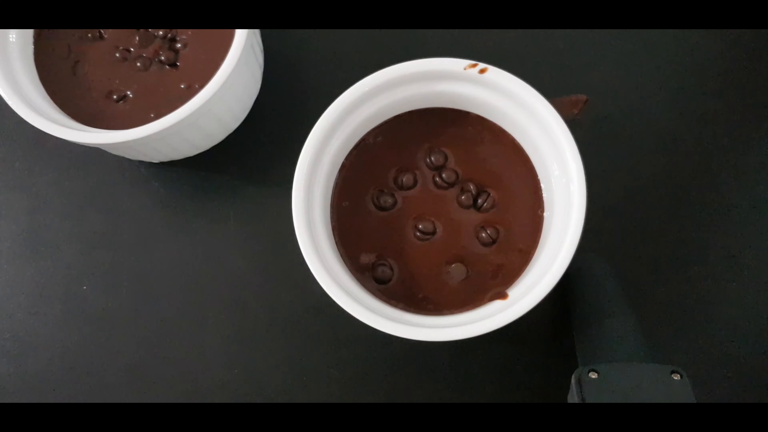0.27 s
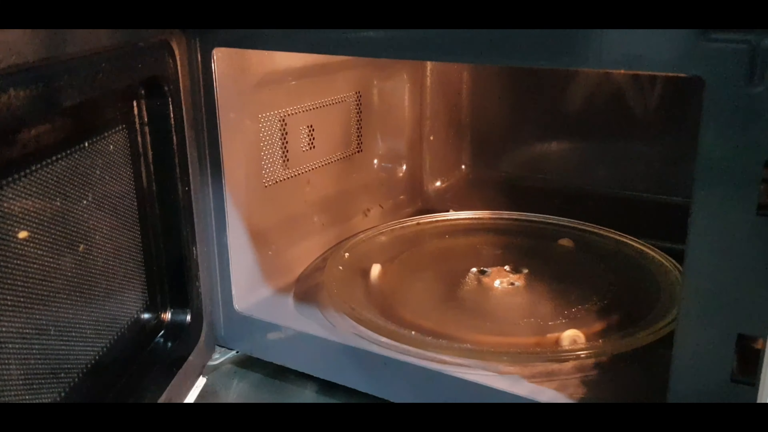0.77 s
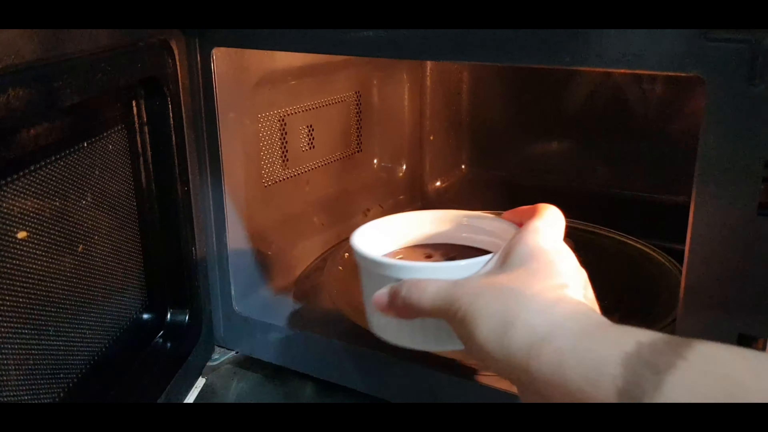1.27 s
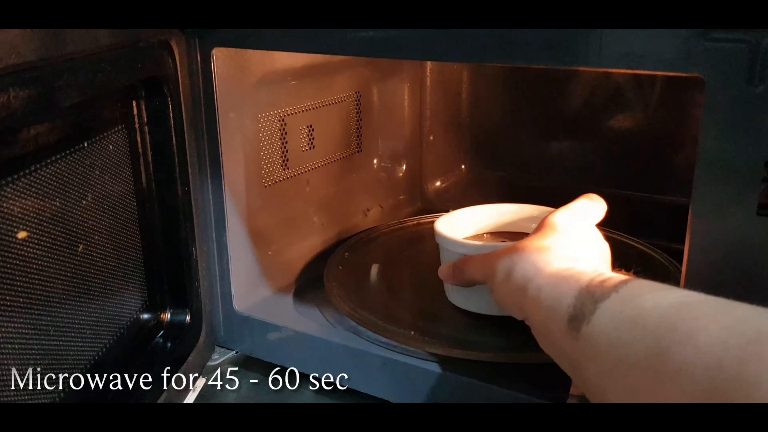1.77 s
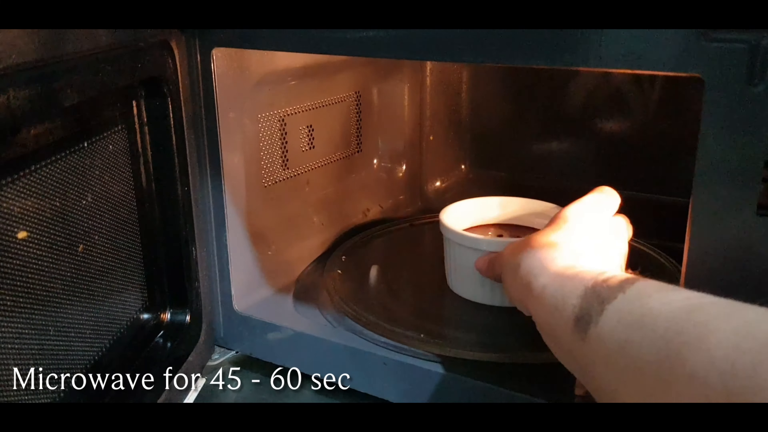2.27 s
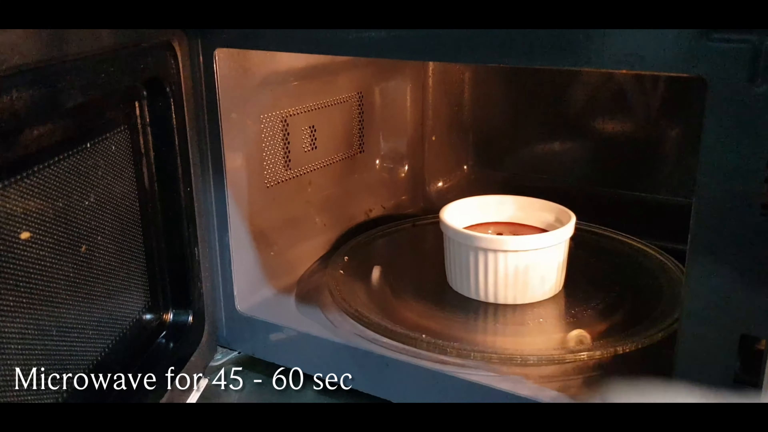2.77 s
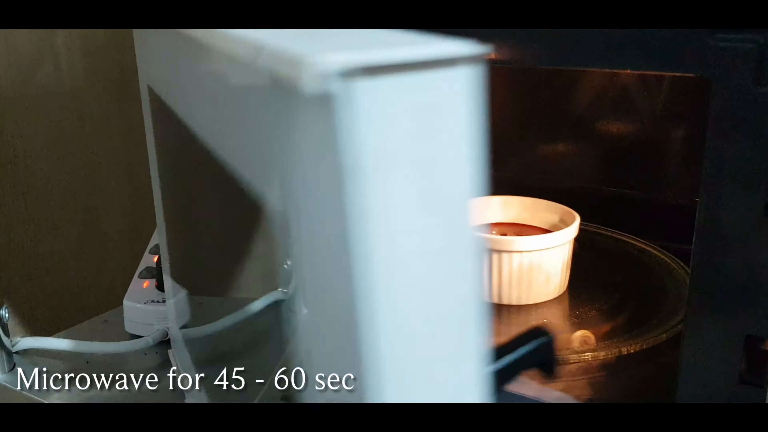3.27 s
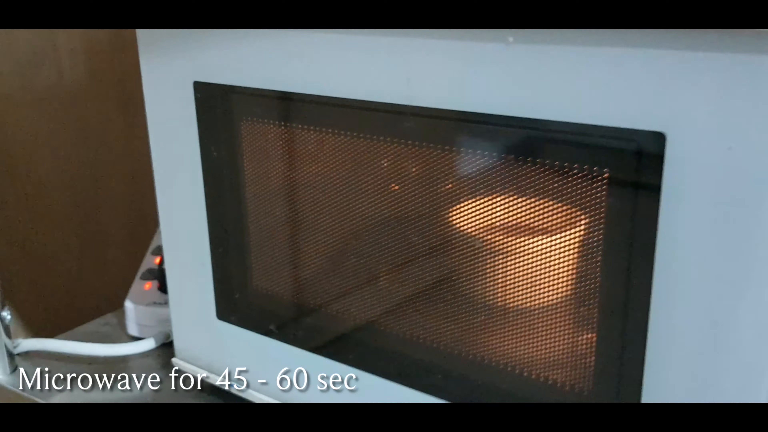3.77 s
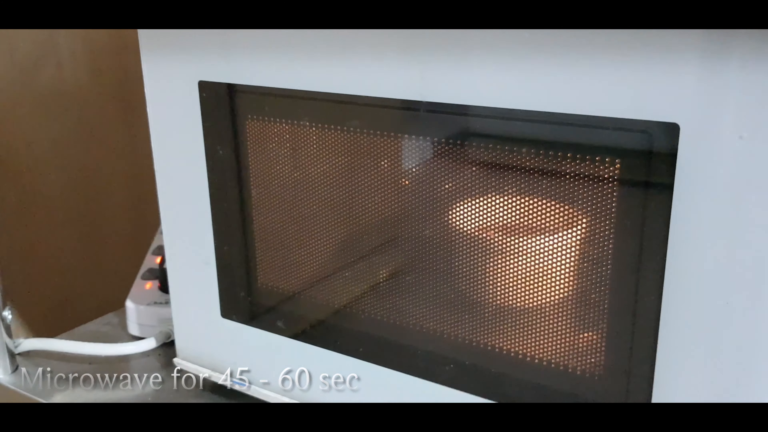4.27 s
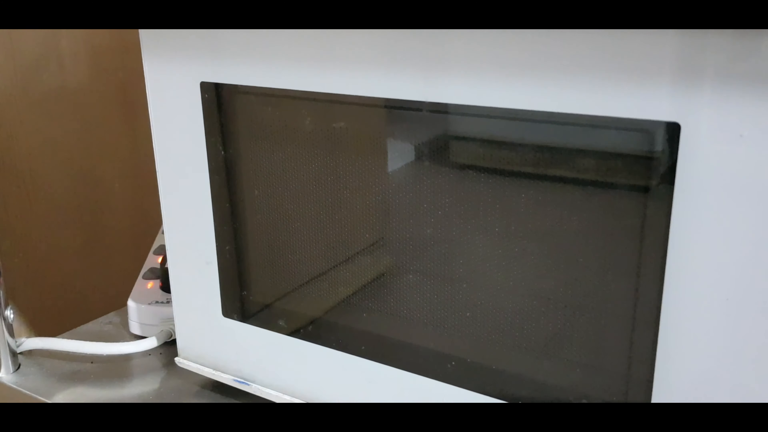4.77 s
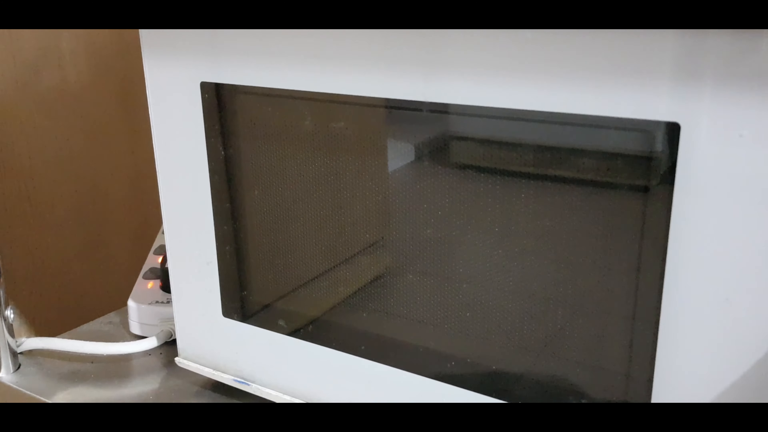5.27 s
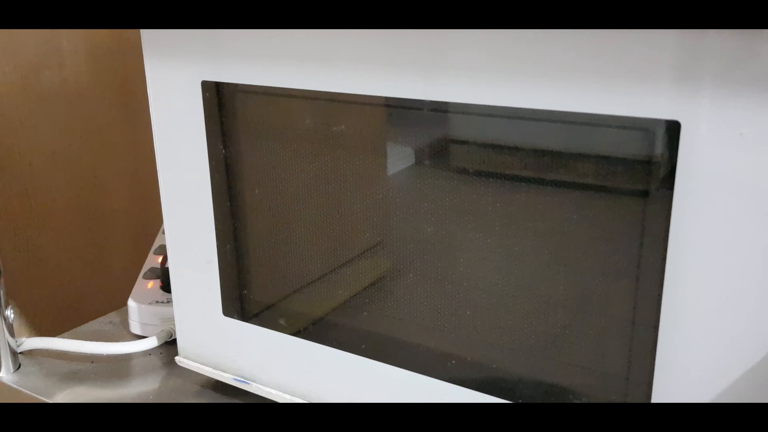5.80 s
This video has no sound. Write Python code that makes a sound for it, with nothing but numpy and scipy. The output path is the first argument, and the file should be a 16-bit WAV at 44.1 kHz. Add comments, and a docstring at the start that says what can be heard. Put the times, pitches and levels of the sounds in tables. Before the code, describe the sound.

In a small kitchen, a ceramic dish clinks and rocks onto a glass microwave plate, scrapes slightly, then the door latches and slams shut.

```python
"""Street rumble, room noise and rustling sleeves come first, then a tick, in a small kitchen on a close stereo pair.
A ceramic dish is set on the glass plate of a microwave oven, rocks once and is nudged into place.
The door swings with a faint squeak, its hooks catch, a switch ticks and the door slams shut; the steel case hums on.
Dish, plate and panels are banks of ringing modes driven by clicks and grit; background, rub, clatter and
reverberation are coloured noise in bands, and the squeak is an unsteady sine."""
import sys
import numpy as np
from scipy import signal
from scipy.io import wavfile

SR = 44100
rng = np.random.default_rng(int(sys.argv[2]) if len(sys.argv) > 2 else 0)


def digitize_waveform(pressure):
    """Quantize a signal to 16-bit integers and store it at the path in sys.argv[1].

    Rows of a 2-D input are taken as channels; values are limited to [-1, 1].
    """
    field = np.atleast_2d(pressure).T
    bounded = np.clip(field, -1, 1)
    quanta = np.round(bounded * 32767).astype(np.int16)
    wavfile.write(sys.argv[1], SR, quanta)


N = 266231   # samples
TIME = np.arange(N) / SR   # s

# noise bands 0.4 octave wide, f/Hz
EDGES = 22 * 2 ** np.arange(0, 9.9, .4)
CENTRES = np.sqrt(EDGES[1:] * EDGES[:-1])

# dish meets plate: [t/s, plate push level/dB, dish push level/dB, contact sharpness f/Hz]
TOUCHES = [(1.741, -8, -28.5, 7100), (1.868, -39.5, -60, 2500), (2.035, -26.5, -41, 2480),
           (2.0403, -48, -24.5, 6500), (2.172, -66, -40.5, 700), (2.389, -71, -69, 5020),
           (2.417, -53, -50.5, 5970), (2.494, -50.5, -56, 5000), (2.635, -67, -51, 5170)]
# dish dragged over the plate: (start t/s, attack t/s, hold t/s, release t/s, relative level/dB)
SLIDE = (2.33, .14, .09, .14, -47)
SLIDE_UNEVEN_DB = 4.5   # it sticks and slips
# colour of a dish foot on glass: [f/Hz, relative level/dB per Hz]
KNOCK_COLOUR = [(240, -50.5), (400, -26), (572, -7), (1040, 0), (2610, -25), (3310, -17.5), (4590, -35.5),
                (5400, -44), (7060, -43), (12800, -42), (14000, -74.5)]
# modes of the door leaf: [f/Hz, relative level/dB, 60 dB decay t/s]
DOOR_MODES = [(108, -14, 0.33), (197.4, -12.5, 0.78), (216.5, -3, 0.34), (325, -11.5, 0.16),
              (396.5, -0.5, 0.11), (543, -20, 0.56), (874, -15, 0.46), (1070, 4, 0.15),
              (1180, -18.5, 0.088), (1850, -18, 0.13), (2280, -22.5, 0.065), (2450, -8.5, .25),
              (2549, -6.5, 0.24), (2660, -15.5, 0.28), (2750, -18, 0.18), (6500, -3.5, 0.073)]
# reverberation of the kitchen: [f/Hz, 60 dB decay t/s]
KITCHEN_T60 = [(100, 0.35), (400, 0.56), (1500, 0.33), (5000, 0.37), (15000, 0.29)]


def amp(db):
    """dB to gain."""
    return 10 ** (np.asarray(db) / 20)


def rms_one(x):
    """Scale to rms 1."""
    return x / np.sqrt(np.mean(x ** 2) + 1e-20)


def in_time(points):
    """A curve of (t/s, value) points, one value a sample."""
    t, values = np.transpose(points)
    return np.interp(TIME, t, values)


def at_hz(points, hz):
    """A curve over frequency, read on a log axis."""
    f, values = np.transpose(points)
    return np.interp(np.log(hz), np.log(f), values)


def ramp(start, attack, hold, release):
    """0 to 1 and back: attack, hold, release."""
    corners = start + np.cumsum([0, attack, hold, release])
    return np.interp(TIME, corners, [0, 1, 1, 0])


def swell(start, attack, hold, release, db):
    """Gain of a sound that creeps in, holds and dies away."""
    return amp(db) * ramp(start, attack, hold, release) ** 2


def drift(rate_hz):
    """Slow chance wander of spread 1: noise low-passed at rate_hz, drawn at every 40th sample."""
    r = np.exp(-2 * np.pi * rate_hz * 40 / SR)
    noise = rng.standard_normal(N // 40 + 2002)
    slow = signal.lfilter([1], [1, -2 * r, r * r], noise)[2000:]   # without the filter's start
    return np.interp(np.arange(N) / 40, np.arange(len(slow)), rms_one(slow))


def clicks(times, levels_db):
    """Impulses at the given times."""
    out = np.zeros(N)
    out[np.round(np.asarray(times) * SR).astype(int)] = amp(levels_db)
    return out + 1e-18   # keeps the filters out of denormal numbers


def soften(x, hz):
    """Double one-pole low-pass: a softer contact pushes more slowly."""
    r = np.exp(-2 * np.pi * hz / SR)
    return signal.lfilter([(1 - r) ** 2], [1, -2 * r, r * r], x)


def ring(force, hz, t60):
    """A damped resonator: a unit click starts a sine of height 1 that loses 60 dB in t60 seconds."""
    r, w = amp(-60 / (t60 * SR)), 2 * np.pi * hz / SR
    return signal.lfilter([0, np.sin(w)], [1, -2 * r * np.cos(w), r * r], force)


def noise_bands(likeness):
    """Stereo noise in narrow bands, flat per Hz, with a left-right likeness that depends on frequency."""
    white = rng.standard_normal((2, 2, N))
    bands = []
    for k, hz in enumerate(CENTRES):
        band_pass = signal.butter(2, EDGES[k:k + 2], "band", fs=SR, output="sos")
        mid, side = signal.sosfilt(band_pass, white[k % 2])   # neighbouring bands differ in source
        alike = np.clip(at_hz(likeness, hz), -1, 1)
        bands.append(np.sqrt(1 + alike) * mid + np.sqrt(1 - alike) * side * [[1], [-1]])
    return bands


def band_gains(spectrum):
    """Gains that give the summed bands this colour and rms 1."""
    gains = amp(at_hz(spectrum, CENTRES))
    return gains / np.sqrt(np.sum(gains ** 2 * np.diff(EDGES)) / (SR / 2))


def background():
    """Rumble, room noise and rustle add as powers in shared noise bands; each band flickers a little."""
    # colours of street, room at the worktop, room before the oven, sleeves: [f/Hz, relative level/dB per Hz]
    rumble_colour = [(12, -41), (20, -12.5), (35, 3), (59, 0), (92, 4.5), (124, -25.5), (146, -8),
                     (260, -25.5), (340, -47.5), (570, -120)]
    worktop_colour = [(71, -37), (120, -3), (169, -3), (374, -10.5), (509, -9.5), (632, -19.5), (993, -14),
                      (1150, -19), (2360, -23.5), (4370, -39), (9000, -44), (11700, -72), (19800, -120)]
    room_colour = [(71, -34.5), (120, 0.5), (234, -3.5), (368, -3), (403, -6.5), (457, -21.5), (509, -8.5),
                   (758, -12.5), (993, -10.5), (1380, -15.5), (9000, -41), (11700, -61), (19800, -120)]
    rustle_colour = [(1470, -15.5), (2500, -1.5), (3550, -3.5), (5920, -3), (8800, -9.5), (11400, -5),
                     (14200, -6.5), (16000, -14)]
    # street rumble, and room noise before the oven: [t/s, level/dB]
    rumble_level = [(0, -45), (.25, -51.5), (.65, -46), (1.6, -46), (1.98, -49.5), (2.23, -49), (2.55, -54),
                    (3.0, -47), (3.75, -50.5), (4.5, -46), (4.83, -38), (4.97, -47.5), (5.26, -43.5),
                    (5.8, -56), (6.04, -54)]
    room_level = [(.7, -53.5), (.98, -48), (1.4, -50.5), (2.3, -53.5), (4.2, -52), (4.65, -45.5),
                  (4.95, -49.5), (5.26, -45), (5.5, -53.5), (6.04, -55.5)]
    # sleeve rustles: [start t/s, attack t/s, hold t/s, release t/s, level/dB]
    rustles = [(-.3, 0.23, 0.55, 0.4, -73.5), (0.217, 0.38, 0.15, 0.051, -63.5),
               (0.646, 0.24, .16, 0.32, -58), (1.148, 0.11, .02, 1.07, -62.5), (2.7, 0.31, .5, .6, -72),
               (3.12, .14, 0.031, 0.18, -61), (3.594, 0.53, .1, .3, -68.5),
               (4.397, 0.069, 0.066, 1.4, -69.5)]
    # agreement of the two microphones: [f/Hz, left-right likeness from -1 to 1]
    likeness = [(60, 1), (130, 0.89), (290, 0.9), (640, 0.28), (1410, -0.4), (3100, 0.21), (6820, -0.067),
                (15000, 0)]
    worktop_db, hiss_db = -47, -78   # the hiss is a faint steady treble under the rustles
    right_lag_s = .0001   # the background reaches the left microphone first

    before_oven = TIME > .692   # s; the listener is first at the worktop, then before the oven
    rumble = amp(in_time(rumble_level)) ** 2
    worktop = amp(worktop_db) ** 2 * ~before_oven
    room = amp(in_time(room_level)) ** 2 * before_oven
    rustle = amp(hiss_db) ** 2 + sum(swell(*row) ** 2 for row in rustles)
    powers = rumble, worktop, room, rustle
    spectra = rumble_colour, worktop_colour, room_colour, rustle_colour
    colours = np.transpose([band_gains(spectrum) ** 2 for spectrum in spectra])

    out = np.zeros((2, N))
    for band, colour in zip(noise_bands(likeness), colours):
        level = np.sqrt(sum(c * power for c, power in zip(colour, powers)))
        out += band * level * amp(1.84 * drift(9))
    left, right = out
    return np.array([left, np.roll(right, round(right_lag_s * SR))])


def clatter(contacts, colour, bands, shorten, room_db):
    """Too many modes to count: each band flares at a contact, dies fast, and the room rings after."""
    # decay of the clatter, before shortening: [f/Hz, 60 dB decay t/s]
    door_t60 = [(100, 0.12), (400, 0.18), (1500, 0.079), (5000, 0.13), (15000, 0.047)]
    out = np.zeros((2, N))
    for s, db, rise_s, bright, push_db in contacts:
        start = round(s * SR)
        stop = min(start + SR * 3 // 4, N)
        t = np.arange(stop - start) / SR
        for band, gain, hz in zip(bands, band_gains(colour), CENTRES):
            fast = amp(-60 * t / (shorten * at_hz(door_t60, hz)))
            slow = amp(-60 * t / at_hz(KITCHEN_T60, hz))
            flare = (1 - np.exp(-t / rise_s)) * (fast + amp(room_db) * slow)
            tilt = amp(db + bright * np.log2(hz / 2000))
            out[:, start:stop] += gain * tilt * flare * band[:, start:stop]
    return out


def thud(contacts, modes, soft_hz, leak_hz):
    """Padded pushes set the low, long modes of a panel ringing."""
    s, clatter_db, rise_s, bright, push_db = np.transpose(contacts)
    push = soften(clicks(s, push_db), soft_hz)
    # a small panel hardly radiates slow motion
    push = signal.sosfilt(signal.butter(2, leak_hz, "high", fs=SR, output="sos"), push)
    return sum(amp(db) * ring(push, hz, t60) for hz, db, t60 in modes)


def ticks(bands):
    """Small hard contacts, the door switch among them: short bright clatter and a push on the door leaf."""
    # [t/s, clatter level/dB, rise t/s, brightness/dB per octave, push level/dB]
    contacts = [(.477, -43.5, 0.00041, -6.5, -80), (2.935, -66.5, 0.00046, 3, -80),
                (4.701, -42, 0.0004, -0.5, -36), (4.764, -48, .0005, -8, -43),
                (5.102, -45, 0.00035, -6.5, -36.5)]
    # [f/Hz, relative level/dB per Hz]
    colour = [(700, -16), (1500, -8), (3250, -2.5), (4080, -17), (5070, -2), (9560, -9), (16000, -7)]
    return (clatter(contacts, colour, bands, shorten=0.34, room_db=-12.0)
            + thud(contacts, DOOR_MODES, soft_hz=500, leak_hz=90))


def body(force, modes, rise_s):
    """Each mode builds up over rise_s and rings; neighbours swing against each other and radiate unequally."""
    step = 1 - amp(-60 / (rise_s * SR))
    out = np.zeros((2, N))
    for k, (hz, db, t60, pan_db) in enumerate(modes):
        gains = (-1) ** k * amp(db + np.array([[pan_db / 2], [-pan_db / 2]]))
        out += gains * 2 * step * ring(ring(force, hz, rise_s), hz, t60)
    return out


def crockery():
    """Touches and the gritty slide drive the modes of plate and dish; the oven walls send echoes after."""
    # glass plate, then dish damped by its filling and the hand:
    # [f/Hz, relative level/dB, 60 dB decay t/s, left minus right level/dB]
    plate_modes = [(247.4, -30, 0.45, -1), (522.6, -34.5, 0.36, -5.5), (599, -10, 0.068, 2.5),
                   (755, -13, 0.13, -12), (800, -10, 0.081, -2), (847, -22, 0.38, -5),
                   (940, -28, 0.53, 2.5), (1034, -4.5, 0.048, 11), (1115, -22, 0.12, 4),
                   (1255, -22.5, .1, 13.5), (1412, -11.5, 0.086, 1.5), (1590, -9, .03, -3),
                   (1756, -6.5, 0.35, -14), (1750, -18.5, 0.3, 5), (1806, -26, .55, -8),
                   (1776, -1, 0.06, -14), (2350, -14.5, 0.034, 14.5), (2680, -21, 0.053, -0.5),
                   (2974, -15, 0.1, -15), (2971, -9.5, 0.24, 1), (3030, -27.5, .15, 15),
                   (3212, -11.5, 0.11, 3.5), (3994, -20, 0.017, -11), (4380, -38, 0.25, 2),
                   (4980, -15, 0.06, -6.5), (4947, -12.5, 0.16, -12), (6560, -44, .08, 1),
                   (7010, -30, 0.084, 2), (8800, -41, 0.13, -4), (12300, -32, 0.11, 0.5)]
    dish_modes = [(279, -11.5, 0.19, -1.5), (605, 2.5, 0.099, 12), (848, -1.5, 0.063, -5),
                  (965, -15, 0.052, 4), (1045, 5.5, 0.041, 18), (1320, -1.5, 0.062, -4.5),
                  (1470, -5.5, 0.014, -15), (1870, -2.5, 0.069, 6), (2120, -12.5, 0.13, -6.5),
                  (3200, -11, 0.074, -1), (3336, -8, 0.043, 1), (4520, -15.5, 0.067, 4),
                  (4630, -24.5, 0.061, 1), (6170, -22.5, 0.036, -8), (6150, -22, 0.061, 5.5),
                  (7280, -18.5, .03, 3.5), (7250, -14, 0.057, 11), (8150, -38, .07, 2.5),
                  (9200, -29, .08, 1), (9600, -25.5, .05, 3), (10130, -15, 0.019, 3), (10800, -27, .03, 1),
                  (11800, -24, 0.091, 10.5), (12360, -21, .04, -0.5), (12460, -21, .03, 4),
                  (12550, -14.5, .05, 19), (13040, -28.5, .07, 2.5)]
    # echoes inside the oven: [delay to left t/s, delay to right t/s, relative level/dB]
    echoes = [(.0011, .0003, -16), (.0024, .0019, -11), (.0041, .0052, -14.5), (.0073, 0.0072, -11)]

    grains = (rng.random(N) < 2500 / SR) * rng.standard_normal(N)   # 2500 a second on average
    grit = grains * swell(*SLIDE) * amp(SLIDE_UNEVEN_DB * drift(30))
    plate = soften(grit, 3100) * amp(-22)
    dish = soften(grit, 5500) * amp(-18)
    for s, plate_db, dish_db, sharp_hz in TOUCHES:
        plate = plate + soften(clicks([s], plate_db), sharp_hz)
        dish = dish + soften(clicks([s], dish_db), sharp_hz)

    # the rocking dish comes to rest where the plate's loudest modes swing and damps them
    rest_s, settle_s, muffle_db = 1.797, .012, -21
    damped = [mode for mode in plate_modes if 1700 < mode[0] < 1790]   # Hz
    free = [mode for mode in plate_modes if mode not in damped]
    muffle = amp(muffle_db * np.clip((TIME - rest_s) / settle_s, 0, 1))
    # once it stands flat these modes answer more weakly
    stands_s, standing_db = 2.03, -8
    before_rest = plate * (TIME < rest_s) + 1e-18
    after_rest = plate * (TIME >= rest_s) * amp(standing_db * (TIME > stands_s)) + 1e-18

    plate_rise_s = .0047
    direct = (muffle * body(before_rest, damped, plate_rise_s)
              + body(after_rest, damped, plate_rise_s)
              + body(plate, free, plate_rise_s)
              + body(dish, dish_modes, rise_s=0.011))
    left, right = direct
    out = direct.copy()
    for left_s, right_s, db in echoes:
        out += amp(db) * np.array([np.roll(left, round(left_s * SR)), np.roll(right, round(right_s * SR))])
    return out


def foot_knocks(bands):
    """Each touch of the dish foot also gives a dense, short burst of noise."""
    contacts = [(s, dish_db - 3.0, .002, 0, 0) for s, plate_db, dish_db, sharp_hz in TOUCHES]
    return clatter(contacts, KNOCK_COLOUR, bands, shorten=0.37, room_db=-16.0)


def tail(x, bands, t60s, gap_s):
    """Reverberation: noise that builds over gap_s and dies band by band."""
    t = np.arange(SR // 2) / SR
    decay = sum(band[:, :len(t)] * amp(-60 * t / at_hz(t60s, hz)) for band, hz in zip(bands, CENTRES))
    return signal.fftconvolve(x[None], decay * np.clip(t / gap_s, 0, 1), axes=1)[:, :N]


def walls(ware, bands):
    """Reverberation of the crockery in the oven and, building more slowly, in the kitchen."""
    # [f/Hz, 60 dB decay t/s]
    oven_t60 = [(200, 0.15), (2000, 0.062), (15000, 0.076)]
    mono = ware.mean(0)
    return (amp(-33) * tail(mono, bands, oven_t60, gap_s=.003)
            + amp(-40) * tail(mono, bands, KITCHEN_T60, gap_s=0.012))


def rub(bands):
    """The dragged foot also rubs: dull uneven noise under the ringing grit, coloured like its knock."""
    noise = sum(gain * band for gain, band in zip(band_gains(KNOCK_COLOUR), bands))
    return amp(-10 + SLIDE_UNEVEN_DB * drift(60)) * swell(*SLIDE) * noise


def hinge():
    """A thin, unsteady tone of stick and slip."""
    # hinge slips: [start t/s, attack t/s, hold t/s, release t/s, level/dB before the unsteadiness]
    slips = [(3.345, .03, .03, .11, -71), (3.47, .04, .01, .025, -70)]
    level = sum(swell(*row) for row in slips) * amp(4.6 * drift(40))
    pitch_hz = 3760 + 12 * drift(60)
    return np.sqrt(2) * level * np.sin(2 * np.pi * np.cumsum(pitch_hz) / SR)


def hooks(bands):
    """The hooks catch: a run of contacts clatters and pushes the door leaf."""
    # [t/s, clatter level/dB, rise t/s, brightness/dB per octave, push level/dB]
    contacts = [(4.475, -32, 0.00061, 2, -30.5), (4.478, -32.5, 0.00081, 1, -33.5),
                (4.485, -29, 0.0024, -1, -25), (4.494, -42, .002, 0, -31.5), (4.535, -48.5, .003, -7, -41)]
    # [f/Hz, relative level/dB per Hz]
    colour = [(71, -31), (120, -6), (410, -10), (617, -25), (684, -6), (1070, -9.5), (1210, -6),
              (1680, -0.5), (1830, 2.5), (2200, -5), (4410, -23), (5990, -23.5), (16000, -36.5)]
    return (clatter(contacts, colour, bands, shorten=0.81, room_db=-8.5)
            + thud(contacts, DOOR_MODES, soft_hz=4500, leak_hz=90))


def door_slam(bands):
    """The door hits its frame: dense clatter, and padded pushes that leave the steel case humming."""
    # [t/s, clatter level/dB, rise t/s, brightness/dB per octave, push level/dB]
    contacts = [(5.1246, -25, 0.00019, -1.5, -14), (5.127, -18.5, 0.00031, 1, -14.5),
                (5.133, -26, 0.0028, -2.5, -23.5), (5.139, -37.5, 0.0022, -2.5, -17.5),
                (5.150, -49, .002, -1, -31), (5.197, -63, 0.0045, 0, -33), (5.255, -50, 0.0041, 0.5, -41)]
    # [f/Hz, relative level/dB per Hz]
    colour = [(35, -33.5), (60, -30), (113, -1), (227, -13), (294, -1), (354, -17.5), (666, -11),
              (732, -25.5), (1040, -6.5), (1250, -14.5), (1440, -11.5), (3340, -20.5), (12400, -31),
              (16000, -22.5)]
    # modes of the steel case: [f/Hz, relative level/dB, 60 dB decay t/s]
    case_modes = [(62, -23.5, .2), (92.7, -26, 0.35), (111, -0.5, 0.11), (130, -4, 0.22), (143.7, -28, 2.3),
                  (192, -21, 1.1), (197.4, -14.5, 1.58), (279, -15, 0.21), (287, -2.5, 0.39),
                  (296.6, -14, 2.72), (361, -28.5, 0.51), (397.5, -22, 0.5), (557, -30, 1.05),
                  (855, -21.5, 0.48), (1152, -17.5, 0.2), (1506, -6, 0.13)]
    return (clatter(contacts, colour, bands, shorten=0.81, room_db=-8.5)
            + thud(contacts, case_modes, soft_hz=1510, leak_hz=93))


def scene():
    """All sources at the two microphones."""
    # agreement of the two microphones near the oven: [f/Hz, left-right likeness from -1 to 1]
    door_likeness = [(60, 1), (130, 0.91), (290, 0.98), (640, 0.1), (1410, -0.23), (3100, -0.0068),
                     (6820, -0.24), (15000, 0.93)]
    bands = noise_bands(door_likeness)
    ware = crockery() + foot_knocks(bands) + rub(bands)
    door = ticks(bands) + hinge() + hooks(bands) + door_slam(bands)
    return background() + ware + walls(ware, bands) + door


def record(dry):
    """The microphones lose the deepest bass, peaks are rounded, the top is cut."""
    sound = signal.sosfilt(signal.butter(3, 36, "high", fs=SR, output="sos"), dry)
    rounded = 1.5 * np.tanh(sound / 1.5)
    return signal.sosfilt(signal.ellip(10, .5, 60, 15800, fs=SR, output="sos"), rounded)


dry = scene()
out = record(dry)
digitize_waveform(out)
```